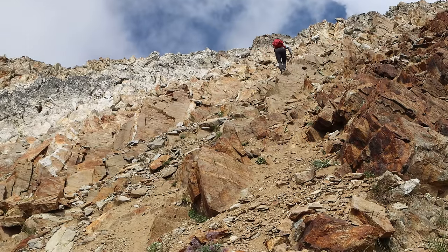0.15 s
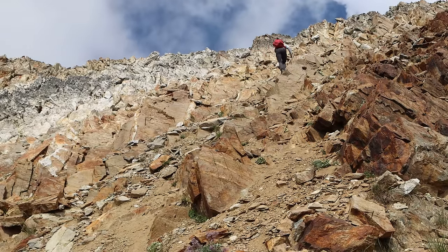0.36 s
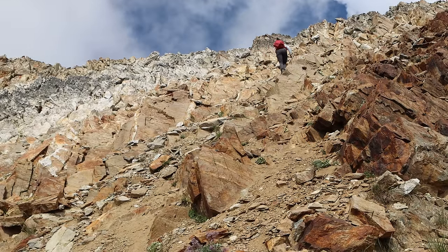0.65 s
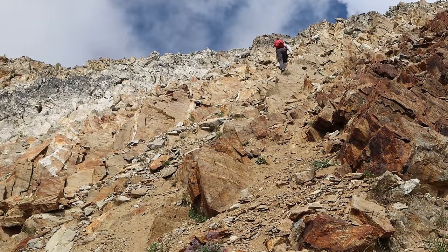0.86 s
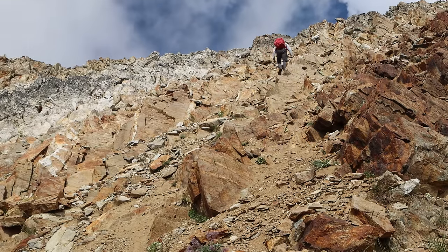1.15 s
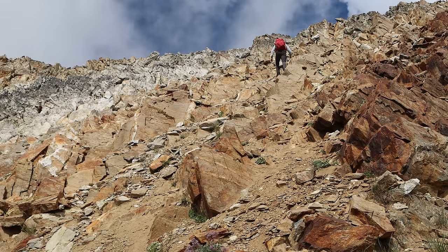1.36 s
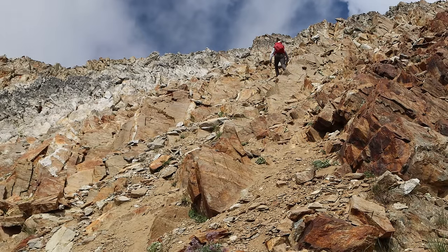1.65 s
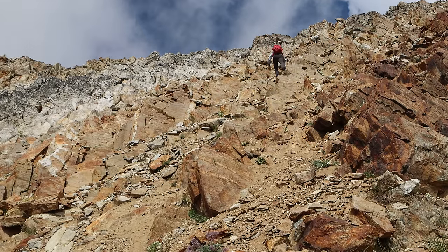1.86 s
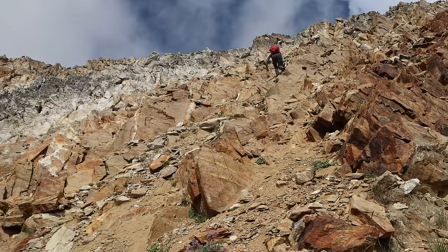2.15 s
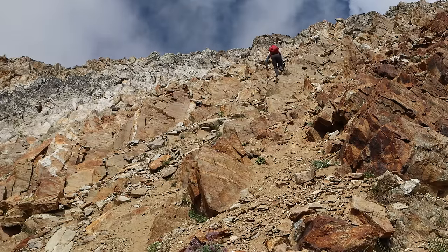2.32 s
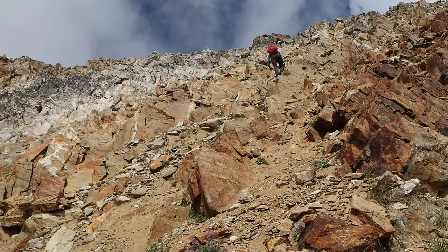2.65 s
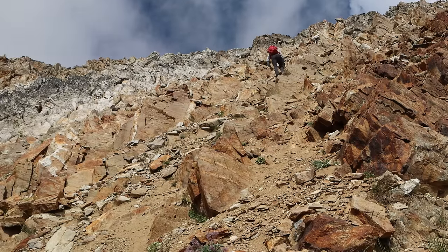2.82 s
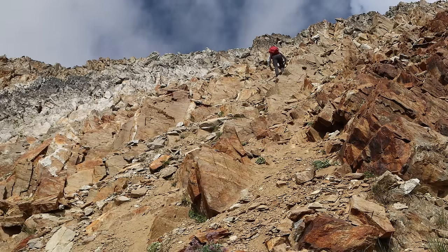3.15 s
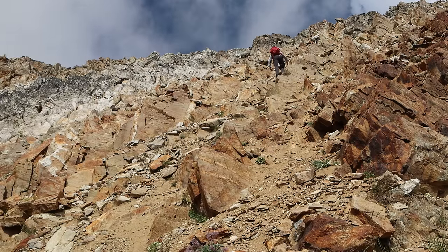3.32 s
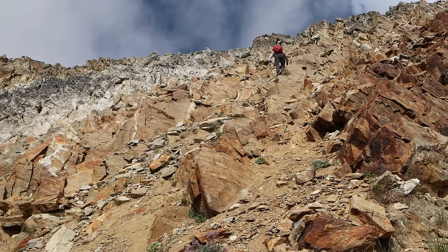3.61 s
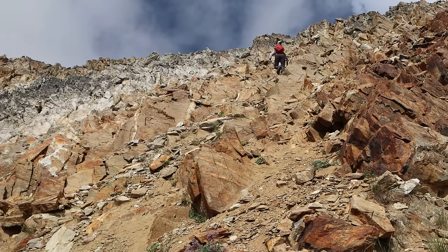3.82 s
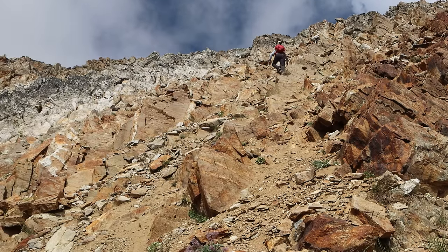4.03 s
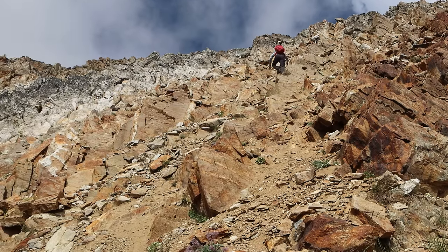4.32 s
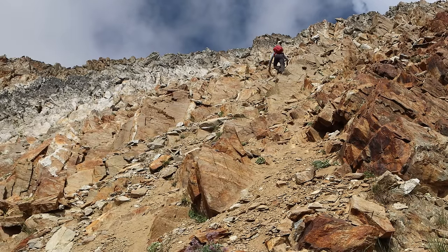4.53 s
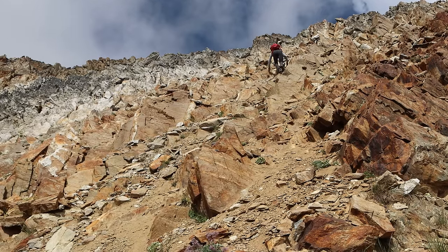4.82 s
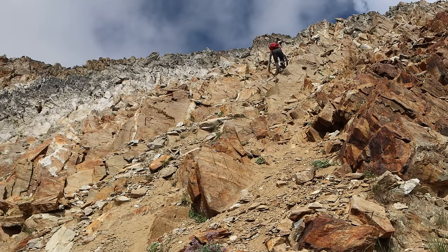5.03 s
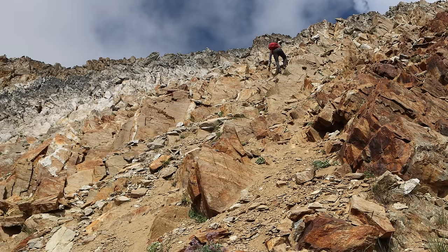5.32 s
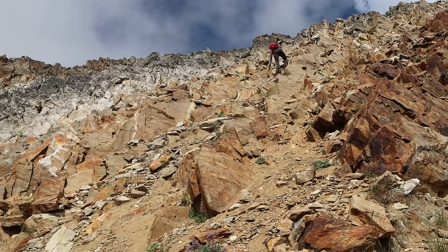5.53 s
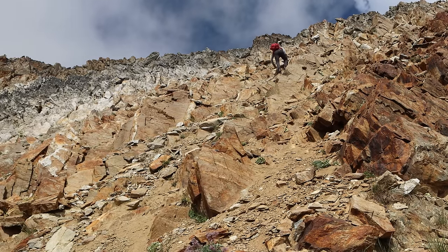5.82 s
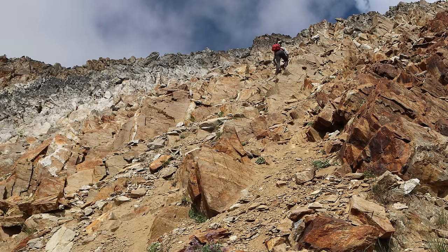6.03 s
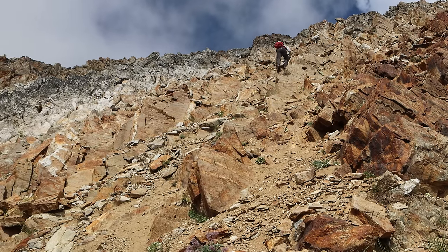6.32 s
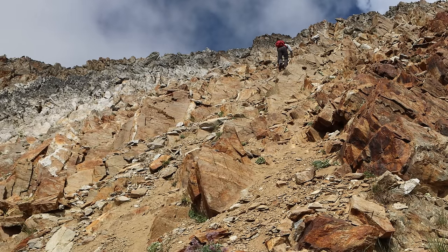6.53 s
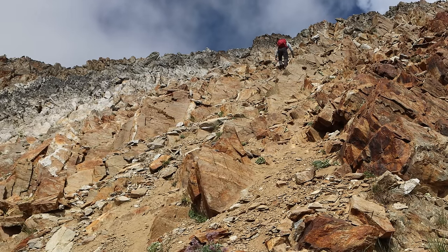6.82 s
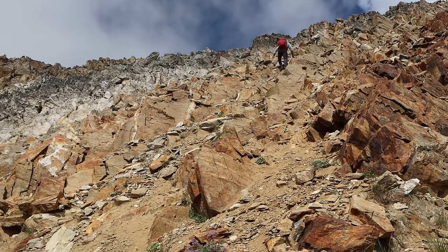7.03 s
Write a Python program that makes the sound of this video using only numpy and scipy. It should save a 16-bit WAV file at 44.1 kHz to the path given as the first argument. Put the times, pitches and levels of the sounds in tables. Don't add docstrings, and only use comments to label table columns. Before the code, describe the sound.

Outdoors on a steep stony hillside, scattered pebbles click and knock, then larger chips arrive with very loud cracks near three and five seconds. Gravel patters and sand trickles between irregular impacts, heavier stones thump the soil and a few blocks knock dryly. Sound is crisp, close and thin in bass, with only a short dull reflection from nearby rock, soft low wind and light hiss.

```python
import sys
import numpy as np
from scipy import signal
from scipy.fft import rfft, irfft, next_fast_len
from scipy.io import wavfile
from scipy.ndimage import uniform_filter1d, map_coordinates

SR = 44100
rng = np.random.default_rng(int(sys.argv[2]) if len(sys.argv) > 2 else 0)


def voltage_ratio(level):
    return 10 ** (np.asarray(level, float) / 20)


def generate_wav(signal):
    frames = np.transpose(np.atleast_2d(signal))
    scaled = np.clip(frames, -1, 1) * 32767
    pcm = np.round(scaled).astype(np.int16)
    wavfile.write(sys.argv[1], SR, pcm)


N = 315756


def unit(x):
    return x / np.sqrt(np.mean(x ** 2) + 1e-20)


def coloured(x, points):
    hz, db = np.transpose(points)
    size = next_fast_len(N + 8192)
    grid = np.fft.rfftfreq(4096, 1 / SR)
    gain_db = np.interp(np.log(grid + 1), np.log(hz), db)
    cepstrum = irfft(np.log(voltage_ratio(gain_db)))
    cepstrum = cepstrum * np.r_[1, 2 * np.ones(2047), 1, np.zeros(2047)]
    response = irfft(np.exp(rfft(cepstrum)))
    return irfft(rfft(x, size) * rfft(response, size), size)[:N]


def place(seconds, rows):
    start = np.round(np.asarray(seconds) * SR).astype(int)
    at = start[:, None] + np.arange(rows.shape[1])
    return np.bincount(at.ravel(), rows.ravel(), N + SR)[:N]


def wobble(rate):
    knots = rng.standard_normal(int(N * rate / SR) + 4)
    return map_coordinates(knots, [np.arange(N) * rate / SR])


def rough_noise(count, size, step, depth_db):
    noise = rng.standard_normal((count, size))
    jumps_db = depth_db * rng.standard_normal((count, size // step))
    return noise * voltage_ratio(jumps_db.repeat(step, 1))


def rings(hz, cycles, size, rise=.15):
    turns = np.asarray(hz)[:, None] * np.arange(size) / SR
    age = turns / np.clip(np.reshape(cycles, (-1, 1)), 1.2, 90)
    rows = np.sin(2 * np.pi * turns) * voltage_ratio(-20 * age) * (1 - np.exp(-age / rise)) ** 2
    return rows / np.abs(rows).max(axis=1, keepdims=True)


def clacks(s, db, hz, cycles, second_hz, grit_db, grit_s=.023, size=1200):
    t = np.arange(size) / SR
    body = rings(hz, cycles, size) + .5 * rings(second_hz, 2.1, size)
    specks = rough_noise(len(s), size, step=20, depth_db=3)
    f = np.fft.rfftfreq(size, 1 / SR) + 1

    def hump(centre_hz):
        return 1 / (1 + (1.19 * np.log(f / centre_hz[:, None])) ** 2)

    dust = irfft(rfft(specks) * (hump(hz) + 0.017 * hump(second_hz)), size)
    dust = dust / dust.std(axis=1, keepdims=True)
    fade = voltage_ratio(-60 * t / grit_s) * (1 + .5 * voltage_ratio(-60 * t / .004))
    grit = voltage_ratio(grit_db + 3)[:, None] * dust * fade
    peak = voltage_ratio(np.minimum(db, -3))
    return place(s - .0002, peak[:, None] * (body + grit))


def pebbles(s, db, hz, grit_db, grit_s, size, ring):
    draw = rng.random((len(s), 3))
    cycles = 1.2 + ring * draw[:, 0]
    second_hz = np.minimum(hz * (1.29 + 0.51 * draw[:, 1]), 14000)
    return clacks(s, db, hz, cycles, second_hz, grit_db + 4 * draw[:, 2], grit_s, size)


def wind_and_hiss():
    # frequency in Hz, gain in dB.
    air_colour = [(15, -2), (40, 11.5), (80, 1.5), (300, -17.5), (700, -22.5), (5000, -38), (10000, -31),
                  (16000, -21.5)]
    air = unit(coloured(rng.standard_normal(N), air_colour))
    return voltage_ratio(-45.0 + np.linspace(-2.2, 2.2, N)) * air


def patter(count, hz, spread, cycles, scatter_db):
    draw = rng.random((count, 4))
    pitch = np.clip(hz * np.exp(spread * rng.standard_normal(count)), 900, 14000)
    sign = np.sign(draw[:, 2] - .5)
    loud = voltage_ratio(-scatter_db * np.log(draw[:, 1] + .01)) * sign
    grains = rings(pitch, cycles * (.5 + draw[:, 3]), size=120)
    return place(draw[:, 0] * N / SR, loud[:, None] * grains)


def patchy(x, depth_db):
    z = signal.stft(x, nperseg=256)[2]
    field = uniform_filter1d(rng.standard_normal(z.shape), size=8, axis=0)
    field = uniform_filter1d(field, size=14, axis=1)
    return signal.istft(z * voltage_ratio(depth_db * unit(field)), nperseg=256)[1][:N]


def slide(stones):
    # time in seconds, gravel level in dB, sand level in dB, ground rumble in dB.
    flow = [(0.0, -49, -79, -47.5), (0.54, -53, -58, -52), (0.88, -53.5, -64, -57), (1.04, -50.5, -66, -43),
            (1.28, -49.5, -47.5, -49.5), (1.52, -47.5, -44.5, -45.5), (1.99, -43, -46, -45),
            (2.77, -45, -49, -45.5), (3.05, -39.5, -40, -44.5), (3.69, -38.5, -39.5, -44),
            (4.09, -41, -46.5, -41.5), (4.59, -39.5, -41, -40), (5.14, -37.5, -42.5, -42.5),
            (5.5, -44.5, -44.5, -44.5), (6.18, -43.5, -44, -45.5), (6.34, -47.5, -45.5, -46.5),
            (6.84, -42.5, -38.5, -41.5), (7.16, -42, -41, -44.5)]
    # frequency in Hz, gain in dB.
    gravel_colour = [(300, -8.5), (700, 9), (1000, 8), (1600, -0.5), (2600, 2.5), (4700, 1), (6500, 11),
                     (12000, -43)]
    sand_colour = [(2000, -16), (4700, 3), (5800, -3), (7200, -3), (8600, 0), (10000, 1), (15500, 4),
                   (17000, 0)]
    ground_colour = [(70, -32.5), (140, -4), (200, -4.5), (340, -4.5), (460, -8.5), (800, -29)]
    s, *levels = np.transpose(flow)
    gravel_db, sand_db, ground_db = [np.interp(np.arange(N) / SR, s, level) for level in levels]

    stone_power = signal.lfilter([1], [1, 1 / 180 - 1], stones ** 2)
    shake = np.log(stone_power / voltage_ratio(2 * gravel_db) + 300)
    shake = uniform_filter1d(shake, size=SR // 70)
    stir = unit(shake - uniform_filter1d(shake, size=SR // 4))
    clump = 1.4 * stir + .7 * wobble(18) + 1.3 * wobble(60)

    gravel = unit(patter(count=14000, hz=3000, spread=.5, cycles=1.4, scatter_db=3.6))
    gravel = gravel + .6 * rng.standard_normal(N)
    sand = unit(patter(count=6000, hz=9500, spread=.4, cycles=3.5, scatter_db=4.5))
    sand = sand + .4 * rng.standard_normal(N)

    gravel = voltage_ratio(gravel_db - 3.4) * unit(voltage_ratio(clump) * coloured(gravel, gravel_colour))
    sand_sway = .3 * clump + 2.8 * wobble(50) + .4 * wobble(14)
    sand = voltage_ratio(sand_db - .1) * unit(voltage_ratio(sand_sway) * coloured(sand, sand_colour))
    ground_sway = 1.2 * clump + 2.4 * wobble(35) + .7 * wobble(12)
    ground = coloured(rng.standard_normal(N), ground_colour)
    ground = voltage_ratio(ground_db + .1) * unit(voltage_ratio(ground_sway) * ground)

    draw = rng.random((1000, 3))
    at = draw[:, 0] * N / SR
    stray_hz = 1700 * 7.0 ** draw[:, 1]
    stray_db = np.interp(at, s, np.maximum(*levels[:2])) + 1 + 5 * draw[:, 2] ** 2
    stray_db = stray_db + .4 * clump[(at * SR).astype(int)]
    strays = pebbles(at, stray_db, stray_hz, grit_db=-7, grit_s=.012, size=400, ring=.4)
    return patchy(gravel + sand + ground, 1.7) + strays


def small_stones():
    # start in seconds, peak in
    # dB, ring in Hz.
    small_stone_hits = [(.891, -26.5, 2580), (.97, -23, 2650), (0.996, -19.5, 2620), (1.03, -22, 1480),
                        (1.3554, -22, 3400), (1.7567, -23, 3760), (2.4733, -21.5, 1160), (2.7686, -17, 3380),
                        (2.861, -18, 1700), (3.3415, -17, 2740), (3.5317, -11.5, 1917), (3.9602, -14, 1740),
                        (4.107, -24, 1810), (4.2891, -16.5, 1290), (5.1163, -15, 1290), (5.1233, -11, 3630),
                        (5.182, -14, 3000), (5.2834, -20.5, 930), (5.609, -23, 980), (5.8528, -20.5, 3130),
                        (5.8987, -19, 3840), (5.9392, -16, 2320), (6.2861, -20, 2190), (7.0584, -19, 2900),
                        (0.0294, -21.5, 5070), (0.2635, -22.5, 5330), (0.6926, -26.5, 4500), (1.3482, -23, 4800),
                 (1.386, -22, 4470), (1.689, -25, 5400), (2.567, -11.5, 13000), (2.6985, -19, 5850),
                 (3.0962, -18, 4180), (4.1884, -18, 5300), (4.502, -17, 6060), (4.6078, -18, 4180),
                 (4.6365, -15, 4530), (4.863, -16.5, 5570), (5.002, -16, 5850), (5.017, -13.5, 6100),
                 (5.163, -17, 6000), (5.3061, -13, 6800), (5.326, -20, 5070), (5.8647, -26, 12900),
                 (6.3496, -16.5, 13800), (6.5037, -13, 10600), (6.5863, -20, 2850), (6.949, -11.5, 2800),
                 (6.879, -30, 6000), (7.0875, -19, 6360), (7.1446, -25, 9500),
                        (1.062, -30, 2540), (1.104, -33, 1440), (1.13, -34, 1580), (1.153, -30, 1790),
              (1.242, -25, 2000), (1.427, -26.5, 1230), (1.586, -27, 1690), (1.631, -24, 3020),
              (2.49, -26, 1270), (2.511, -23.5, 1870), (2.569, -24, 900), (2.842, -19, 4660),
              (5.476, -22.5, 2190), (6.119, -23, 1900), (6.378, -25, 5000),
                        (0.0523, -33, 1530), (0.1051, -30, 1530), (0.5685, -40, 1960), (0.7462, -33, 2080),
              (1.062, -30.5, 1210), (1.854, -30, 616), (1.9998, -28, 1550), (2.1437, -22, 1100),
              (2.1846, -34.0, 1060), (2.2844, -25.5, 620), (2.4001, -23, 1750), (2.5344, -22.5, 1990),
              (2.5658, -24, 735), (2.9636, -20.5, 1270), (3.0953, -21, 1930), (3.2387, -33, 990),
              (3.3414, -25, 820), (3.5106, -23, 1020), (3.5468, -27, 1080), (3.6433, -15.5, 1090),
              (3.9788, -22, 1330), (4.126, -24, 1140), (4.266, -31, 1240), (4.6737, -29, 2500),
              (4.9703, -25, 1300), (5.0934, -31, 1600), (5.1691, -21, 1280), (5.2485, -20, 1220),
              (5.2834, -18, 2140), (5.7103, -27.5, 2010), (5.8815, -26, 1100), (5.939, -26.5, 970),
              (6.0725, -17, 1560), (6.2965, -21, 1240), (6.417, -30, 1100), (6.702, -29, 1160),
              (6.721, -26, 1490), (6.9901, -21, 1140), (7.0521, -24, 1210), (7.0593, -23, 1160),
              (7.1262, -29, 990), (7.135, -29.5, 880),
                        (0.1413, -32, 4370), (0.3711, -29, 2660), (1.004, -26, 2880), (1.0375, -34, 4020),
              (1.1141, -33, 4560), (1.2125, -21, 3620), (1.3467, -30, 3190), (1.3757, -28, 4610),
              (1.4977, -27, 4800), (1.6194, -26, 4500), (1.6375, -28, 2730), (1.81, -28, 2580),
              (1.4167, -26, 4500), (1.8641, -33, 2430), (2.0782, -25, 4800), (2.3462, -25, 4330),
              (2.3784, -25, 3160), (2.4742, -19.5, 4520), (2.743, -23.5, 4650), (2.7613, -24, 2820),
              (2.868, -19, 4240), (3.1752, -21, 3240), (3.217, -22, 3190), (3.583, -32, 4424),
              (3.7041, -19, 2930), (3.8824, -22, 4020), (4.4883, -19.5, 3579), (4.729, -21, 3210),
              (4.8337, -15, 2900), (4.9252, -18, 2730), (4.956, -23, 2650), (5.1349, -25, 4200),
              (5.2613, -27, 2350), (5.3321, -24, 3230), (5.3605, -24.5, 2730), (5.5416, -15, 3300),
              (5.7483, -24.5, 3790), (6.0101, -15.5, 2360), (6.0531, -19, 4000), (6.1026, -19.5, 4390),
              (6.2074, -28, 2550), (6.2448, -19, 2720), (6.3226, -26, 2410), (6.3321, -26, 3190),
              (6.5034, -26, 2460),
                        (0.194, -29, 9020), (0.46, -32, 5790), (0.8567, -33, 5370), (0.9886, -32, 5040),
              (1.521, -27, 6850), (1.7948, -22, 8150), (1.8797, -19, 8500), (2.0985, -18, 7990),
              (2.1688, -28, 12120), (2.2342, -25, 8250), (2.428, -21, 4960), (2.6751, -18, 8600),
              (2.923, -3, 10300), (2.997, -16, 6100), (3.1141, -20, 8330), (3.247, -12, 8000),
              (3.348, -18, 9190), (3.4986, -27, 5150), (3.5952, -26, 5580), (4.157, -26, 7260),
              (4.2775, -24, 8590), (4.2873, -19, 5560), (4.4314, -20, 7900), (4.699, -21, 5120),
              (5.0435, -23, 5140), (5.0593, -11.5, 6550), (5.3259, -26.0, 9130), (5.401, -17, 6500),
              (5.4509, -27.0, 7800), (5.495, -25, 7110), (5.6051, -27, 6480), (5.6173, -29, 7600),
              (5.65, -21.5, 8400), (5.7896, -23.5, 7860), (5.9245, -19, 6480), (6.1213, -21, 7690),
              (6.2774, -16, 8700), (6.361, -29, 8330), (6.4252, -25.5, 5100), (6.4324, -22, 4910),
              (6.5756, -3, 10600), (6.6885, -20, 9000), (6.7869, -27, 4910), (6.82, -21, 7470),
              (6.8663, -11, 6750), (7.015, -14, 11840), (7.0314, -25, 4870), (7.0766, -22, 5990)]
    s, db, hz = np.transpose(small_stone_hits)
    return pebbles(s, db, hz, grit_db=-18, grit_s=0.02, size=1200, ring=2.0)


def one_shape(hits, cycles, ratio):
    s, db, hz, grit_db = np.transpose(hits)
    second_hz = hz * np.where(hz > 7500, min(ratio, 1 / ratio), ratio)
    return clacks(s, db, hz, cycles, second_hz, grit_db)


def rock_hits():
    # start in seconds, peak in dB, ring in Hz, grit in dB against the peak.
    wedges = [(.0524, -25.5, 5130, -19), (.1996, -17, 2470, -27), (.4225, -21, 1980, -15.5),
              (.4869, -15, 3720, -27), (1.0037, -23, 2150, -18), (1.9984, -15, 4940, -16),
              (2.4047, -17, 4900, -15), (2.9052, -13.5, 1270, -9), (2.9094, -7, 4560, -19),
              (2.964, 12, 4930, -24), (3.5335, -13.5, 3680, -26), (4.2994, -7.5, 9700, -19),
              (4.4, -11.5, 2760, -21), (4.4983, -10, 3530, -20), (4.734, -18, 8400, -8),
              (5.0599, -3, 2500, -36), (5.2435, -31, 2230, -2.5), (5.55, -18, 2200, -22),
              (5.7479, -15, 910, -20), (6.2241, -11, 5650, -52), (6.2985, -17, 6500, -6.5),
              (6.7987, -10, 1140, -13), (6.9901, -17, 5600, -9)]
    lumps = [(.0669, -22, 2050, -27), (.5105, -23, 3180, -38), (.9118, -21, 2540, -25),
             (.9316, -24, 1870, -12), (1.4445, -25, 1500, -1.5), (1.9569, -25, 1020, -21),
             (2.1071, -11.5, 7100, -19), (2.9228, -11.5, 3020, -14), (3.1843, -14.5, 2240, -11.5),
             (3.323, -8.5, 2560, -38), (3.644, -10, 1750, -18.5), (3.7713, -12, 3220, -33),
             (4.1632, -8.5, 6400, -19.5), (4.3686, -17.5, 2140, -13.5), (4.5488, -2, 2880, -23.5),
             (4.798, -14, 7000, -15), (4.8339, -17, 3900, -17), (4.9068, 13, 6300, -17.5),
             (4.924, -15, 4000, -13), (5.1971, -7, 1780, -34), (5.226, -15, 1800, -19.5),
             (5.5425, -11.5, 1178, -29), (5.885, -18.5, 2500, -22), (6.0102, -13.5, 1450, -25),
             (6.2812, -12, 3140, -18), (6.3663, -16.5, 3160, -25), (6.5784, -17, 1800, -5),
             (6.7031, -11, 3020, -39), (6.7905, -25, 8450, 0.5), (6.8666, -15.5, 1230, -8)]
    flakes = [(.2296, -29, 5800, -12), (.5295, -24.5, 5540, -9.5), (.977, -24.5, 1900, -10),
              (2.0984, -18, 5500, -16), (2.7028, -18.5, 8200, -26), (3.3032, -3, 8400, -12.5),
              (3.3058, 1, 9000, -43), (3.7675, -18, 2950, -3.5), (3.9301, -13, 3940, -19),
              (4.814, -15.5, 6040, -10), (4.8862, -15.5, 2770, -8), (4.9967, -14.5, 7260, -13),
              (5.0808, -14.5, 7060, -32), (5.1201, -5, 3680, -16.5), (6.2455, -19.5, 7650, -14)]
    chips = [(.935, -19.5, 2870, -18), (1.5989, -16, 3300, -12), (2.3009, -15, 1800, -15),
             (2.7193, -18.5, 2580, -37), (3.1505, -15, 1210, -10.5), (3.3338, -9.5, 4020, -14),
             (3.5173, -13.5, 2120, -33), (3.752, -11.5, 2730, -13.5), (3.948, -6, 2420, -22),
             (6.5758, -15, 1280, -7.5), (6.7782, -15.5, 2140, -12)]
    total = one_shape(lumps, cycles=0.74, ratio=1.68)
    total = total + one_shape(chips, cycles=1.47, ratio=1.97)
    total = total + one_shape(wedges, cycles=2.28, ratio=0.67)
    return total + one_shape(flakes, cycles=5.7, ratio=1.4)


def thumps():
    # start in seconds, peak in dB, thump in Hz.
    landings = [(.422, -32.5, 550), (1.589, -29, 235), (1.879, -27, 298), (2.298, -26, 380),
                (2.472, -24.5, 430), (2.538, -28, 410), (2.567, -31, 203), (2.599, -25.5, 258),
                (2.924, -20.5, 328), (3.152, -26, 286), (3.339, -27.5, 316), (3.512, -27, 354),
                (3.644, -22, 410), (4.194, -27.5, 330.4), (4.5, -21.5, 436), (4.598, -23.5, 420),
                (4.753, -25, 140), (4.926, -25, 336), (5.0585, -22.5, 199), (5.282, -25.5, 214),
                (5.402, -11.5, 364), (5.5356, -16.5, 366), (5.747, -39, 524), (6.0552, -21.5, 264),
                (6.298, -29, 196), (6.577, -27, 193), (6.597, -26, 270), (6.87, -17, 415),
                (6.9502, -17, 233), (6.99, -17.5, 234),
                (0.104, -36.5, 300), (.201, -33.5, 324), (0.529, -36, 300), (0.961, -36, 260),
             (1.027, -33.5, 250), (1.072, -35.5, 262), (1.45, -31, 295), (2.102, -33.5, 244),
             (2.438, -29.5, 307), (2.486, -30, 304), (3.771, -30, 403), (3.829, -30.5, 332),
             (4.401, -29, 330), (4.551, -31, 367), (4.819, -30, 212), (5.207, -27.5, 223), (6.01, -32, 242),
             (6.801, -28, 320)]
    # start in seconds, peak in dB, ring in Hz.
    slab_taps = [
        (1.9275, -23, 880),
        (1.9572, -24, 850),
        (2.0469, -27, 920),
    ]
    # frequency in Hz, gain in dB.
    thump_colour = [(60, -16), (150, 0), (20000, 0)]
    s, db, hz = np.transpose(landings)
    low = rings(hz, 1.89, size=1600, rise=0.031)
    low = low + 0.24 * rings(hz * 1.73, 0.64, size=1600)
    slab_s, slab_db, slab_hz = np.transpose(slab_taps)
    slab = voltage_ratio(slab_db)[:, None] * rings(slab_hz, 8.0, size=1600, rise=.04)
    return coloured(place(s, voltage_ratio(db + 4.5)[:, None] * low), thump_colour) + place(slab_s, slab)


def scrapes(size=4096):
    # start in seconds, length in seconds, rms level in dB, colour in Hz.
    skids = [(2.904, 0.061, -34, 4000), (5.234, 0.043, -31, 1200), (1.014, 0.016, -47, 1800),
             (1.605, .04, -42, 2100), (3.505, .009, -26.5, 3300), (3.529, .009, -30, 1800),
             (3.654, 0.0064, -31, 6000), (3.714, 0.011, -31, 3600), (4.531, .012, -26, 1300),
             (4.56, 0.034, -33.5, 1100), (4.591, .018, -28.5, 2300), (4.628, 0.012, -23, 4600),
             (4.694, 0.0078, -27, 1400), (5.111, 0.015, -35, 2300), (4.3, .038, -33.5, 5600),
             (3.8, 0.045, -37, 3300), (4.231, 0.007, -28.5, 2900), (2.9, 0.03, -30, 4000),
             (2.808, 0.03, -37, 4100), (2.7, 0.036, -36.5, 4600), (2.5, .016, -36, 2100),
             (6.6, 0.046, -35.5, 3800), (2.4, .018, -32, 2300), (1.085, 0.054, -53, 1300),
             (5.882, 0.0054, -27.5, 2400), (6.581, .016, -19.5, 5500), (6.59, 0.0081, -16.5, 12000),
             (7.008, .009, -29, 6000)]
    s, length, db, hz = np.transpose(skids)
    f = np.fft.rfftfreq(size, 1 / SR) + 1
    rough = rough_noise(len(s), size, step=32, depth_db=4)
    rasp = irfft(rfft(rough) / (1 + (1.1 * np.log(f / hz[:, None])) ** 2), size)
    rasp = rasp / rasp.std(axis=1, keepdims=True)
    swell = np.sin(np.pi * np.clip(np.arange(size) / SR / length[:, None], 0, 1))
    return place(s, voltage_ratio(db)[:, None] * swell * rasp)


def blocks():
    # start in seconds, peak in dB, ring in Hz, ringing in cycles.
    knocks = [
        (1.2124, -4.5, 3250, 1.7),
        (5.403, -12.5, 2760, 9.6),
        (5.4031, -3.5, 1330, 1.6),
        (5.5325, -6.5, 826, 1.24),
        (6.053, -8.5, 645, 0.76),
        (6.948, -8.5, 930, 1.6),
        (6.132, -38, 8550, 60),
        (6.15, -36, 8600, 55),
        (6.175, -37, 8700, 46),
        (6.183, -35, 8550, 60),
    ]
    s, db, hz, cycles = np.transpose(knocks)
    return place(s, voltage_ratio(db)[:, None] * rings(hz, cycles, size=800))


def rock_echo(x):
    t = np.arange(SR // 10) / SR
    tail = uniform_filter1d(rng.standard_normal(len(t)), size=3)
    tail = tail * voltage_ratio(-60 * t / .06) * (t > .002)
    return signal.fftconvolve(x, tail / np.linalg.norm(tail))[:N]


def scene():
    stones = rock_hits() + thumps() + blocks() + scrapes() + small_stones()
    echo = voltage_ratio(-21) * rock_echo(stones)
    return (stones + echo + slide(stones) + wind_and_hiss())[None]


def top_cut(x):
    return signal.sosfilt(signal.butter(12, 15800, fs=SR, output="sos"), x)


def record(dry):
    # frequency in Hz, gain in dB.
    mic_response = [(20, -19), (110, -3), (3800, 0), (4700, 2), (5600, 0), (7400, -1), (8700, 2.5),
                    (10300, -6), (13000, -4), (15800, -10), (16050, -36), (17500, -60)]
    heard = coloured(dry[0], mic_response)
    heard = heard / (1 + np.abs(heard / .95) ** 4) ** .25
    return top_cut(heard[None])


dry = scene()
out = record(dry)
generate_wav(out)
```